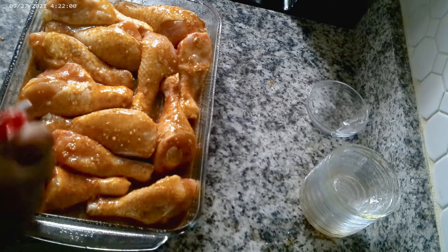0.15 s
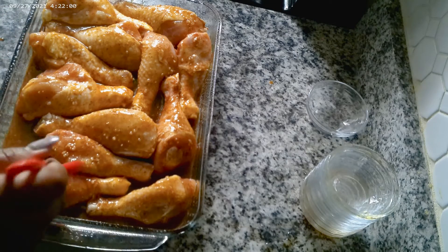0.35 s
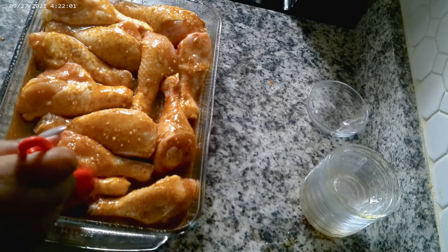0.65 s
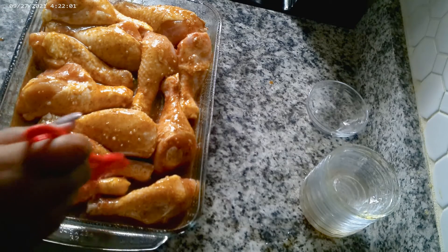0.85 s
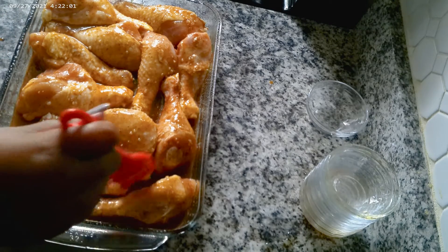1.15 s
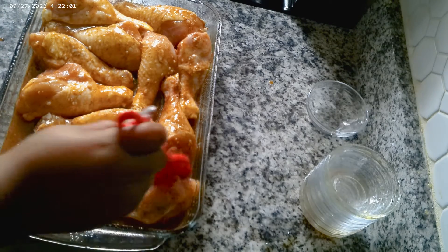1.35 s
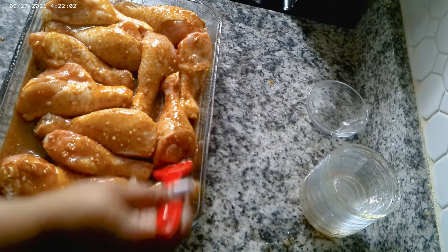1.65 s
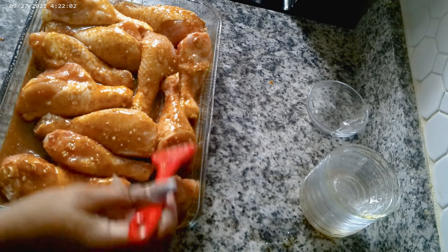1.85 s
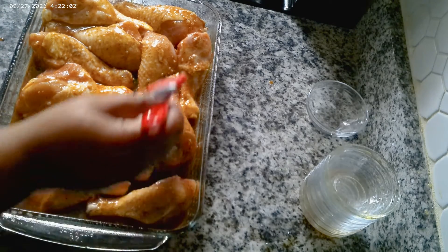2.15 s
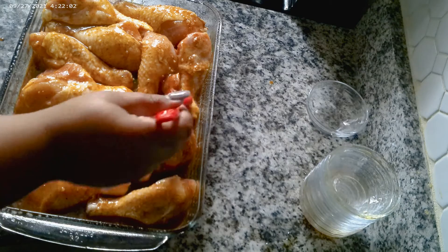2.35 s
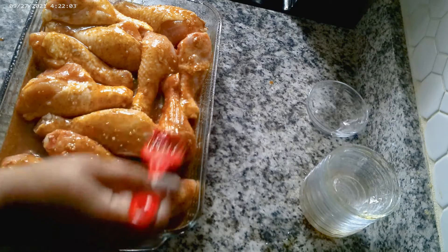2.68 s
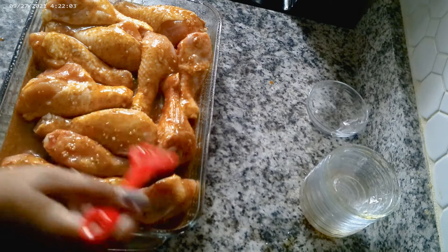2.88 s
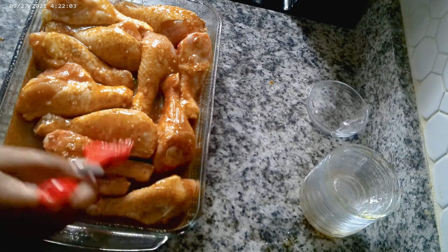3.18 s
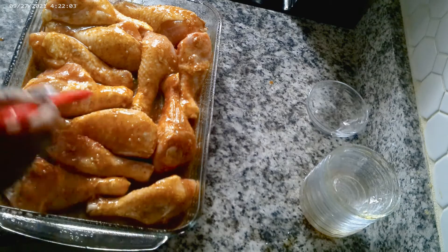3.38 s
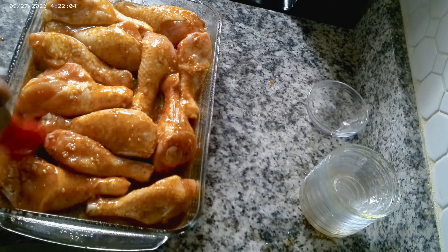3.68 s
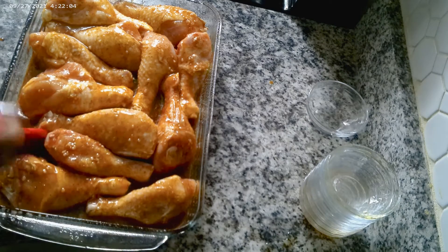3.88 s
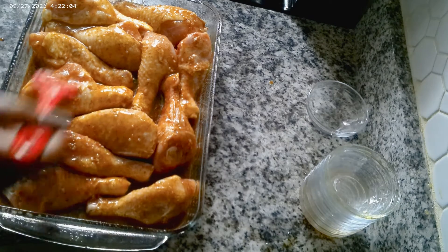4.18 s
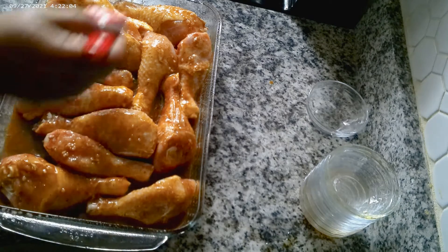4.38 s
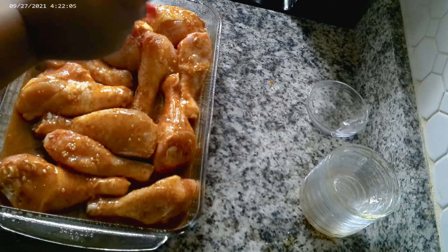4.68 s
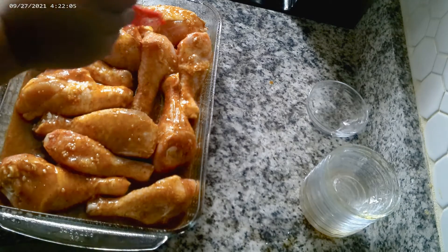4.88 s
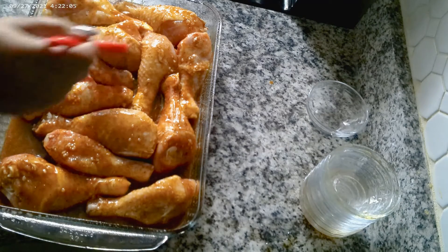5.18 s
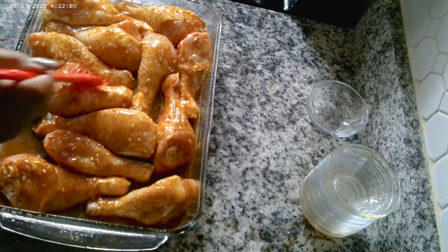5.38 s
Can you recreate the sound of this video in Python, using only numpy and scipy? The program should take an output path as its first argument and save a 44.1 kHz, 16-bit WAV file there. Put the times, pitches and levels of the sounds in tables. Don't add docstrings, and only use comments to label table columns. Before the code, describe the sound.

Steady electrical hum and muffled room noise run throughout. Brushing sauce onto chicken jolts a loaded glass baking dish: three increasingly firm thuds, a quick small rebound, then the loudest, clearer rim knock on the stone counter. Later there is one barely audible shove and another hollow knock. Close, slightly dull camera microphone, with short echoes from hard walls.

```python
import sys
import numpy as np
from scipy import signal
from scipy.fft import rfft, irfft
from scipy.io import wavfile
from scipy.ndimage import uniform_filter1d

SR = 44100
rng = np.random.default_rng(int(sys.argv[2]) if len(sys.argv) > 2 else 0)


def wrap_up_sound(samples):
    columns = np.atleast_2d(samples).T
    tamed = np.clip(columns, -1, 1)
    steps = np.round(tamed * 32767).astype(np.int16)
    wavfile.write(sys.argv[1], SR, steps)


def magnitude_from_level(level_db):
    exponent = np.asarray(level_db, float) / 20
    return 10 ** exponent


N = 243917


def rms_one(x):
    return x / np.sqrt(np.mean(x ** 2) + 1e-20)


def drift(rate_hz):
    steps = rng.standard_normal(400)
    return np.interp(np.arange(N) / SR * rate_hz, np.arange(400), steps) * 1.22


def gain_at(spectrum, size):
    hz, level_db = np.transpose(spectrum)
    grid_hz = np.maximum(np.fft.rfftfreq(size, 1 / SR), 1)
    return magnitude_from_level(np.interp(np.log(grid_hz), np.log(hz), level_db, left=-60, right=-80))


def coloured(spectrum):
    white = rfft(rng.standard_normal(N))
    return rms_one(irfft(white * gain_at(spectrum, size=N), N))


def even_burst(shape):
    burst = rfft(shape * rng.standard_normal(len(shape)))
    return burst / np.sqrt(uniform_filter1d(np.abs(burst) ** 2, size=10))


def low_pass(x, hz, order):
    return signal.sosfilt(signal.butter(order, hz, fs=SR, output="sos"), x)


def placed(sound, s, level_db):
    out, at = np.zeros(N + len(sound)), round(s * SR)
    out[at:at + len(sound)] = magnitude_from_level(level_db) * sound / np.abs(sound).max()
    return out[:N]


# multiple of the mains frequency, level in dB rms.
HUM_HARMONICS = [(1, -33.3), (2, -54.7), (3, -47.7), (4, -62.8), (5, -56.7), (6, -76), (7, -65.4)]


def hum():
    mains_hz, start_rad, skew_rad = 59.9837, .915, .068
    turn = 2 * np.pi * mains_hz * np.arange(N) / SR + start_rad
    out = np.zeros(N)
    for k, db in HUM_HARMONICS:
        lead = skew_rad * k * k if k % 2 else -np.pi / 2 + 2 * skew_rad * k
        out += np.sqrt(2) * magnitude_from_level(db) * np.cos(k * turn + lead)
    return out


# frequency in Hz, density in dB per Hz.
RUMBLE_SPECTRUM = [(4, -1), (14, 3), (22, -18), (30, 1), (42, -14.5), (75, -12), (100, -7), (125, -12),
                   (160, -18.5), (230, -19), (270, -24), (380, -31), (500, -41)]


def rumble():
    return magnitude_from_level(-46 + 1.04 * drift(8.3)) * coloured(RUMBLE_SPECTRUM)


# frequency in Hz, density in dB per Hz.
AIR_SPECTRUM = [(300, 2.5), (450, -0.5), (600, 1), (780, 2), (900, -3.5), (1100, -9), (1500, -13.5),
                (2000, -18.5), (3000, -19.5), (4500, -23.5), (7000, -26.5), (11000, -30.5), (16000, -32),
                (20000, -42)]


def air():
    return magnitude_from_level(-55 + 0.077 * drift(3.02)) * coloured(AIR_SPECTRUM)


def whine():
    centre_hz, width_hz, level_db = 12000, 150, -86.5
    band_hz = [centre_hz - width_hz / 2, centre_hz + width_hz / 2]
    narrow = signal.butter(1, band_hz, "band", fs=SR, output="sos")
    return magnitude_from_level(level_db) * rms_one(signal.sosfilt(narrow, rng.standard_normal(N)))


def kitchen(x):
    t60_s, wall_cut_hz, level_db = 0.24, 1900, -13
    t = np.arange(round(.9 * SR)) / SR
    decay = magnitude_from_level(-60 * t / t60_s) * np.clip(t / 0.0016, 0, 1)
    tail = irfft(even_burst(decay), len(t)) * (t < .7)
    tail = low_pass(tail, wall_cut_hz, order=1)
    tail = tail / np.sqrt(np.sum(tail ** 2))
    return magnitude_from_level(level_db) * signal.fftconvolve(x, tail)[:N]


def tilt(hz, tilt_db):
    return tilt_db * np.log2(np.clip(hz, 480, 1600) / 700)


def ring(force, hz, t60_s):
    r, w = magnitude_from_level(-60 / (t60_s * SR)), 2 * np.pi * hz / SR
    return signal.lfilter([0, np.sin(w)], [1, -2 * r * np.cos(w), r * r], force + 1e-18)


def struck(modes, push, tilt_db, spread_db):
    body = 0
    for hz, db, t60_s in modes:
        uneven = push * rng.standard_normal(len(push))
        touching = rng.random(len(push)) < .06
        mode = ring(uneven * touching, hz, t60_s)
        level_db = db + tilt(hz, tilt_db) + spread_db * rng.standard_normal()
        body = body + magnitude_from_level(level_db) * mode / np.abs(mode).max()
    return body


# frequency in Hz, level in dB, t60 in seconds.
COUNTER_MODES = [(98, -3, 0.23), (125, -17.5, 0.23), (134, -15.5, 0.103), (196, -10, 0.243)]


def counter_thump(push):
    return struck(COUNTER_MODES, push, 0, spread_db=2)


# frequency in Hz, level in dB, t60 in seconds.
GLASS_MODES = [(2150, -5, .03), (2330, -5, .03), (2500, -3, .03), (2690, 0, .04), (2860, -1, .03),
               (3070, -2, .03), (3300, -4, .03), (3550, -7, .025), (3850, -9, .02), (4300, -13, .02)]


def glass_tick(push):
    return struck(GLASS_MODES, push, 0, spread_db=2)


def slap(spectrum, push, tilt_db):
    clutter_t60_s, clutter_db, clutter_cut_hz = 0.15, -0.5, 7500
    t = np.arange(len(push)) / SR
    swell = np.clip(t / 0.0023, 0, 1)
    dull = 1 / np.sqrt(1 + (np.fft.rfftfreq(len(t), 1 / SR) / clutter_cut_hz) ** 2)
    contact = even_burst(np.sqrt(push))
    clutter = magnitude_from_level(clutter_db) * dull * even_burst(magnitude_from_level(-60 * t / clutter_t60_s) * swell)
    tilted = [(hz, db + tilt(hz, tilt_db)) for hz, db in spectrum]
    burst = irfft((contact + clutter) * gain_at(tilted, size=len(t)), len(t))
    return burst * swell * (t < .3)


def dish(blows, modes, colour, slap_db, tick_db, rebound_db):
    body, bright = np.zeros(N), np.zeros(N)
    t = np.arange(round(.4 * SR)) / SR
    gaps_s = np.diff([row[0] for row in blows], prepend=-1)
    for (s, peak_db, thump_db, rattle_s, tilt_db), gap_s in zip(blows, gaps_s):
        push = np.clip(t / 0.0013, 0, 1) ** 2 * np.exp(-t / rattle_s * 2)
        body += placed(struck(modes, push, tilt_db, spread_db=-1.0), s, peak_db)
        body += placed(counter_thump(push), s + .003, peak_db + thump_db)
        is_rebound = gap_s < .1
        bright += placed(glass_tick(push), s, peak_db + tick_db + rebound_db * is_rebound)
        bright += placed(slap(colour, push, tilt_db), s, peak_db + slap_db)
    return low_pass(body, 1800, order=4) + low_pass(bright, 5600, order=4)


# start in seconds, peak in dB, counter thump in dB re peak,
# rattle length in seconds, tilt in dB per octave.
SHOVE_BLOWS = [
    (.7215, -30, -7, 0.0082, 0),
    (.941, -24.5, -6, 0.0075, 0.5),
    (1.439, -23, -0.5, 0.0093, 2.5),
    (1.457, -31.5, -18, 0.0053, -8),
    (1.512, -41.5, -22, 0.0061, 0),
    (2.762, -43.5, 4, 0.014, -6.5),
]
# frequency in Hz, level in dB, t60 in seconds.
LOADED_DISH_MODES = [(290, 4.5, 0.058), (329, 5, 0.05), (404, -1.5, 0.14), (496, 3, 0.071),
                     (552, -18, 0.13), (630, 0.5, 0.033), (731, -8, 0.17), (840, 2, 0.053),
                     (1026, -35, 0.021), (1093, -1.5, 0.025), (1200, -20, 0.034), (1356, -1.5, 0.051),
                     (1567, -18, 0.056), (1660, -17, 0.037)]
# frequency in Hz, density in dB per Hz.
SHOVE_SLAP_SPECTRUM = [(130, -48), (220, -12), (300, -1.5), (410, 1), (580, -5), (760, -5), (930, -5.5),
                       (1230, -17), (1600, -17), (1950, -44), (2250, -34.5), (2900, -31), (4200, -54),
                       (6500, -83)]


def shoves():
    return dish(SHOVE_BLOWS, LOADED_DISH_MODES, SHOVE_SLAP_SPECTRUM, slap_db=1.0, tick_db=-36, rebound_db=19)


# start in seconds, peak in dB, counter thump in dB re peak,
# rattle length in seconds, tilt in dB per octave.
KNOCK_BLOWS = [
    (1.7385, -19, -9.5, 0.0086, 1),
    (3.8115, -24, -5.5, 0.0076, -0.2),
    (3.882, -32.5, -7, 0.006, -19.5),
]
# frequency in Hz, level in dB, t60 in seconds.
RIM_MODES = [(410, -3, 0.12), (478, 2.5, 0.04), (558, 6, 0.034), (668, 3.5, 0.097), (718, 5, .08),
             (780, -28, 0.05), (886, 3.5, 0.1), (906, -3, 0.08), (990, -12, 0.12), (1205, -26, 0.068),
             (1232, -7, 0.054), (1432, -3, 0.02), (1494, 3.5, 0.075), (1890, -15, 0.21)]
# frequency in Hz, density in dB per Hz.
KNOCK_SLAP_SPECTRUM = [(130, -54), (220, -12), (340, -24.5), (450, 5), (590, -4), (700, -1.5), (900, -8),
                       (1080, -11), (1450, -6), (1700, -18), (2100, -23), (2900, -22.5), (5000, -53),
                       (6500, -84)]


def knocks():
    return dish(KNOCK_BLOWS, RIM_MODES, KNOCK_SLAP_SPECTRUM, slap_db=0.5, tick_db=-25, rebound_db=-9)


def scene():
    blows = shoves() + knocks()
    in_room = blows + kitchen(blows)
    background = hum() + rumble() + air() + whine()
    return (in_room + background)[None]


# time step number, lowest lost frequency in Hz, # centres in Hz of two narrow
TREBLE_LOSSES = [(31, 1450, 1750, 2050), (35, 1950, 1950, 4000), (49, 1700, 2400, 4050),
                 (56, 1550, 1550, 2900), (80, 1700, 2600, 3850), (106, 1850, 1850, 3500),
                 (217, 2500, 2500, 2500), (233, 1700, 2200, 4900)]


def lose_treble(x):
    step_s, first_centre_s, fade_s, survivor_boost = 1024 / 48000, .0133, .014, .7
    x, t = x.copy(), np.arange(N) / SR
    for step, low_hz, *kept_hz in TREBLE_LOSSES:
        centre_s = first_centre_s + step * step_s
        hold_s = .003 * any(0 < row[0] - centre_s < step_s for row in KNOCK_BLOWS)
        near = np.abs(t - centre_s) < .05
        size = near.sum()
        hz = np.fft.rfftfreq(size, 1 / SR)
        outside_kept = np.all([np.abs(hz - k) > 90 for k in kept_hz], axis=0)
        removed = (hz > low_hz) * np.where(outside_kept, 1, -survivor_boost)
        treble = irfft(rfft(x[near] * np.hanning(size) ** .25) * removed, size)
        away_s = np.abs(t[near] - centre_s - hold_s / 2) - hold_s
        lost = np.cos(np.pi / 2 * np.clip(away_s / fade_s, 0, 1)) ** 2
        x[near] -= lost * treble
    return x


def band_limit(x):
    return signal.sosfilt(signal.butter(12, 15830, fs=SR, output="sos"), x)


def record(dry):
    cutoff_hz, offset = 15750, -.0065
    x = lose_treble(dry[0])
    x = irfft(rfft(x) * (np.fft.rfftfreq(N, 1 / SR) < cutoff_hz), N)
    mix = (x + offset)[None]
    return band_limit(mix)


dry = scene()
out = record(dry)
wrap_up_sound(out)
```